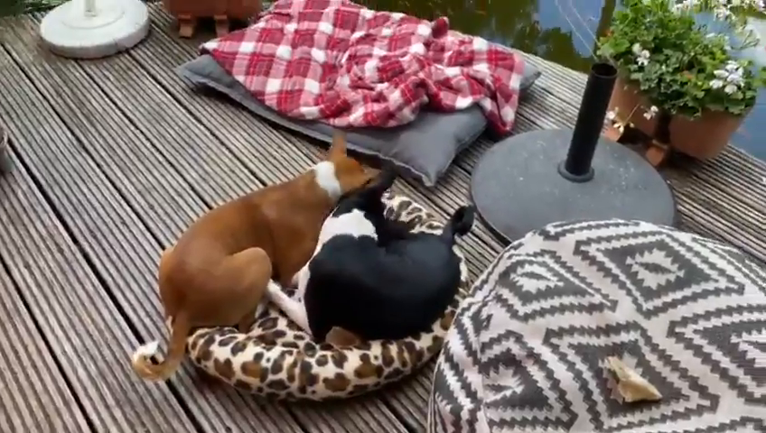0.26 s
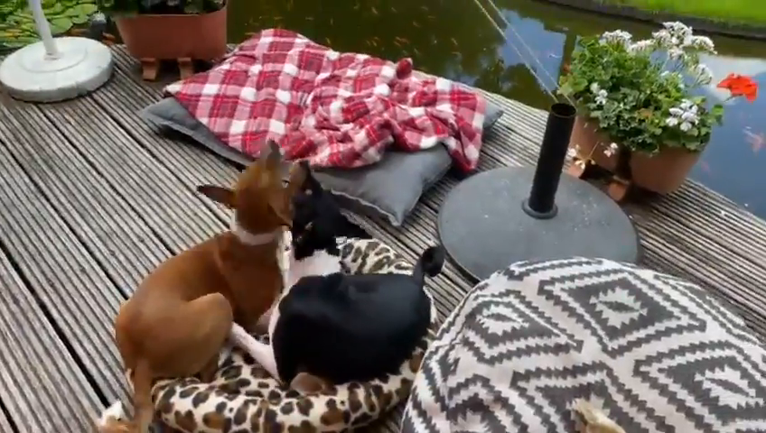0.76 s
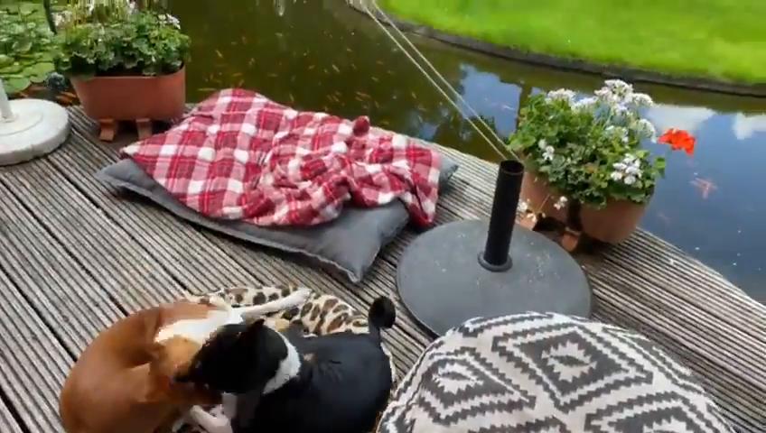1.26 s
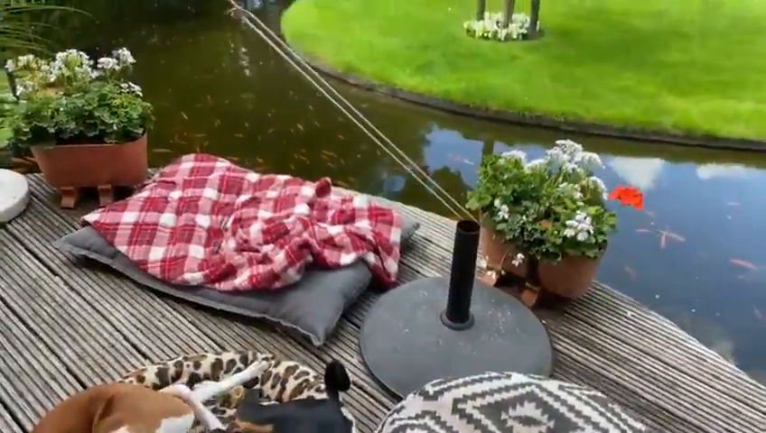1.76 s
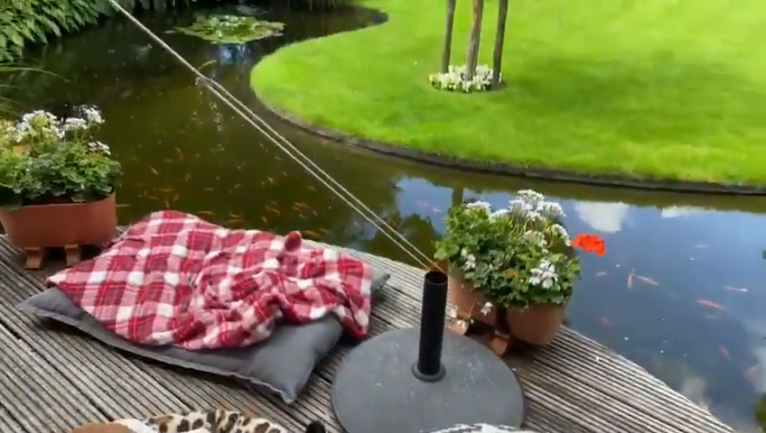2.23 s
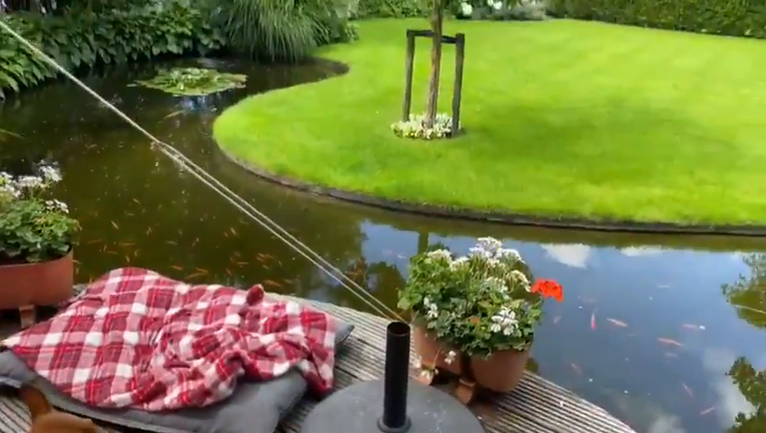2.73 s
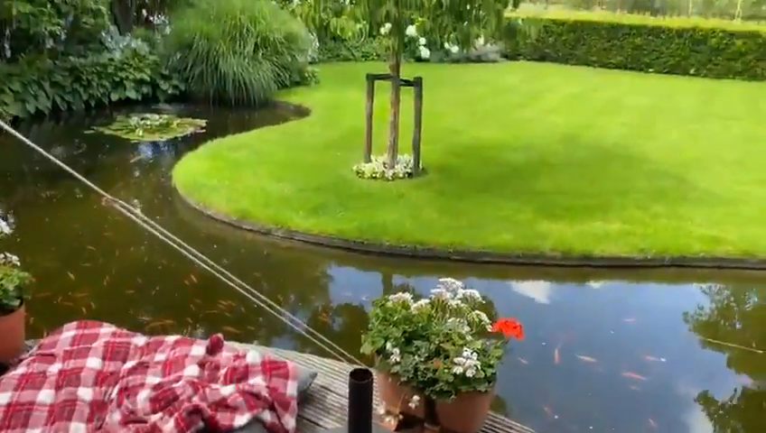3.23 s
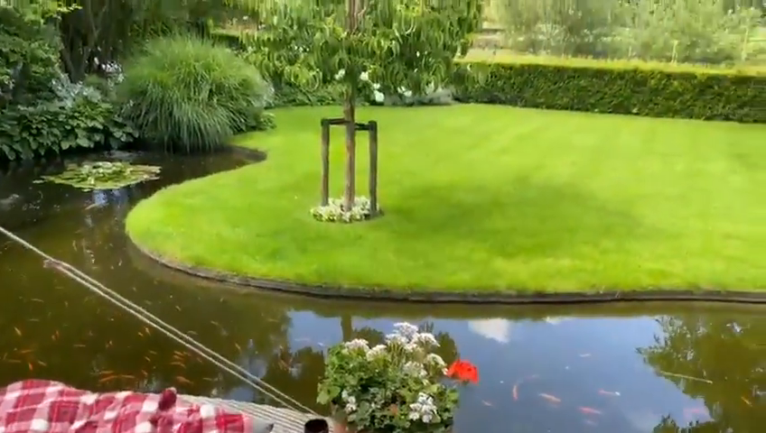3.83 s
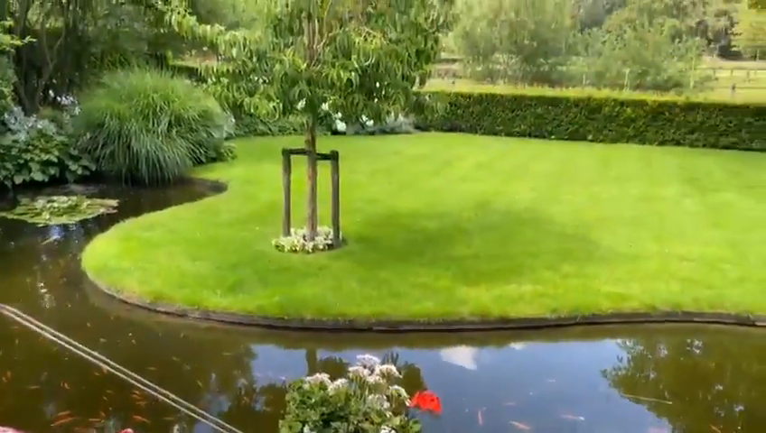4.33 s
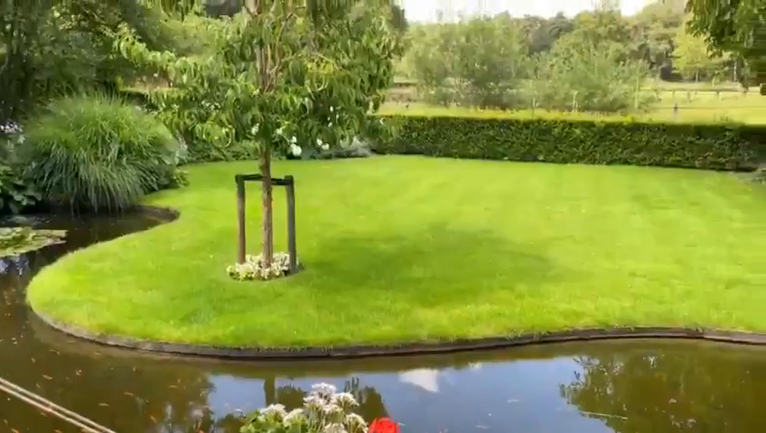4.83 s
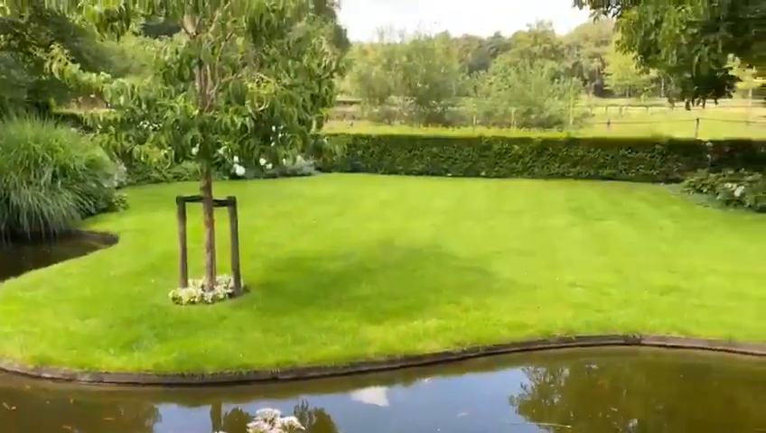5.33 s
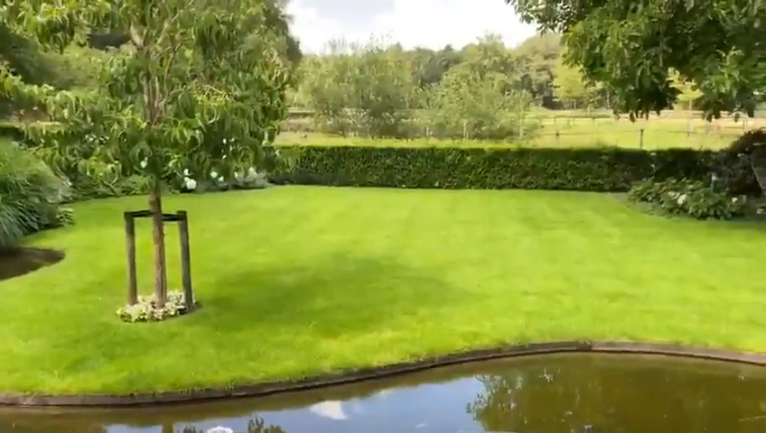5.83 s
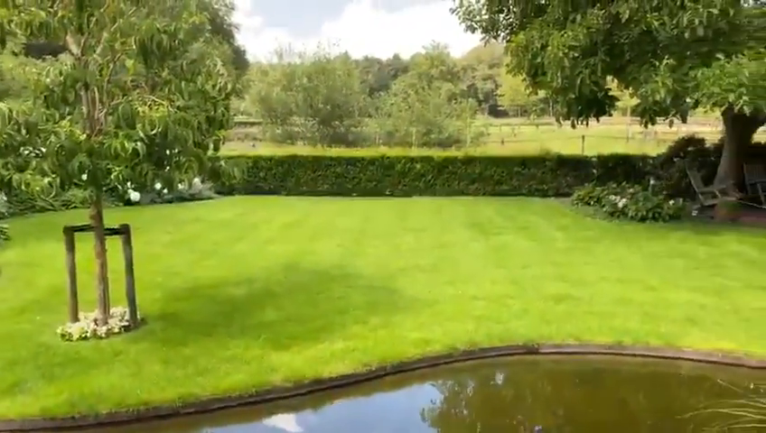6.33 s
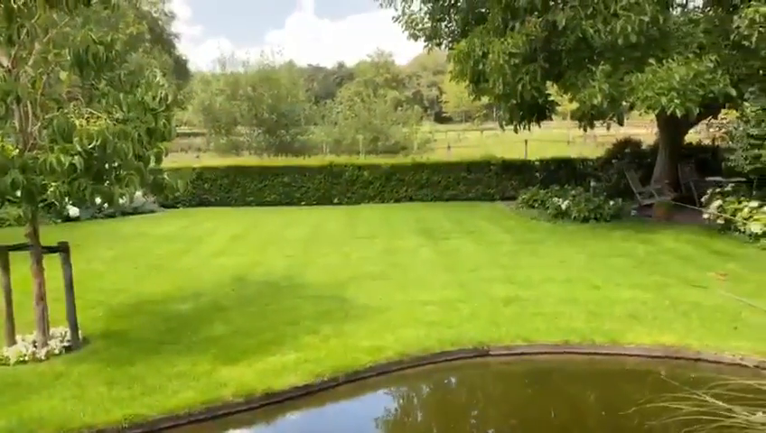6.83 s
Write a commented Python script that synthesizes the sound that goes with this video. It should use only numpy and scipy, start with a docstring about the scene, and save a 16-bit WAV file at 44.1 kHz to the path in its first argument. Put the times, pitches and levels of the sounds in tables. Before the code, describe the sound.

Quiet garden pond with soft trickling and bubbling over a faint low hum, broken once by a dog's short whimper and loud, shrill, cracking yelp.

```python
"""A garden deck by a pond. Throughout, water trickles and splashes off to the left (damped sines, shaped noise),
far machinery hums low (sines, noise) and leaves hiss (noise). Early on paws bump a cushion and fur rubs it.
A dog near the pair of microphones then whimpers and yelps once; the yelp cracks, falls and trails into a whine
(harmonics and hoarse noise). The pair turns slowly, so the water reaches the left one ever earlier."""
import sys
import numpy as np
from scipy import signal
from scipy.fft import rfft, irfft, next_fast_len
from scipy.io import wavfile
from scipy.ndimage import uniform_filter1d, map_coordinates

SR = 44100
rng = np.random.default_rng(int(sys.argv[2]) if len(sys.argv) > 2 else 0)


def master(y):
    """Save y as 16-bit WAV."""
    cut = np.clip(np.atleast_2d(y).T, -1, 1)
    pcm = np.round(cut * 32767)  # scale
    wavfile.write(sys.argv[1], SR, pcm.astype(np.int16))


def amplitude_ratio(level_db):
    """Convert a level in decibels to the matching linear amplitude (field) ratio."""
    exponent = np.asarray(level_db, float) / 20
    return 10 ** exponent


N = 312228


def unit(x):
    """x at rms 1."""
    return x / np.sqrt(np.mean(x ** 2) + 1e-20)


def along(points, hz):
    """(Hz, value) points read at hz on a log axis."""
    point_hz, value = np.transpose(points)
    return np.interp(np.log(hz + 1), np.log(point_hz + 1), value)


def curves(rows):
    """One value per sample for each column after the time."""
    s, *columns = np.transpose(rows)
    return [np.interp(np.arange(N) / SR, s, column) for column in columns]


def wobble(rate_hz):
    """A smooth random curve, rate_hz knots a second."""
    knots = rng.standard_normal(int(N * rate_hz / SR) + 4)
    return map_coordinates(knots, [np.arange(N) * rate_hz / SR])


def coloured(x, spectrum):
    """x filtered by (Hz, dB) points."""
    m = next_fast_len(N + 8192)
    gain = amplitude_ratio(along(spectrum, np.fft.rfftfreq(m, 1 / SR)))
    return irfft(rfft(x, m) * gain, m)[..., :N]


def rush(spectrum, patchy_db, channels):
    """Noise of rms 1 with patches of random gain over time and frequency."""
    z = signal.stft(rng.standard_normal((channels, N)), nperseg=512)[2]
    field = uniform_filter1d(rng.standard_normal(z.shape[1:]), size=7, axis=0)
    field = uniform_filter1d(field, size=6, axis=1)
    patchy = signal.istft(z * amplitude_ratio(patchy_db * unit(field)), nperseg=512)[1][:, :N]
    return unit(coloured(patchy, spectrum))


def plinks(s, gain, hz, cycles, rise):
    """Damped sines with a soft start; pitch drifts by the share rise per unit of life (cycles / hz)."""
    k = np.arange(1400)
    life = k / SR * (hz / cycles)[:, None]
    phase = 2 * np.pi * cycles[:, None] * life * (1 + rise * life / 2)
    envelope = np.exp(-life * 4) * (1 - np.exp(-life * 25))
    waves = gain[:, None] * np.sin(phase) * envelope
    at = (s * SR).astype(int)[:, None] + k
    return np.bincount(at.ravel(), waves.ravel(), N + 1400)[:N]


def burst(s, db, rise_s, hold_s, t60_s):
    """A gain that rises exponentially to db at s, holds and dies away."""
    t = np.arange(N) / SR - s
    decay_db = -60 * np.maximum(t - hold_s, 0) / t60_s
    return amplitude_ratio(db + decay_db) * np.exp(np.minimum(t, 0) / rise_s)


def pair(x, lead_ms):
    """One source at both microphones, the left one lead_ms earlier."""
    n, half = np.arange(N), lead_ms * SR / 2000
    return np.array([map_coordinates(x, [n + half]), map_coordinates(x, [n - half])])


def voice(rows):
    """Vocal folds: harmonics on an unsteady pitch, each spread by breath, over a hoarse hiss; the mouth filters all."""
    # Overtones sink into the throat's resonances as pitch falls.
    # Each row: pitch in Hz, 2nd harmonic in dB, 3rd harmonic in dB re the fundamental.
    overtones = [(947, 6, -8), (1030, -5, -10.5), (1052, 7, -4.5), (1225, -8.5, -14), (1284, -13, -16),
                 (1370, -16.5, -20.5), (1460, -28.5, -30.5), (1570, -10, -26.5), (1740, -20, -45.5),
                 (1950, -33, -48.5)]
    # The mouth's filter. Each row: frequency in Hz, gain in dB.
    mouth = [(4300, 0), (4900, -18), (5600, -12), (6500, -2), (8000, -2), (9500, -10)]
    clear_db, breathy_per_db = -34.5, 0.2  # weaker than clear_db turns breathy
    hz, db = curves(rows)
    pitch_hz, second, third = np.transpose(overtones)
    second_db, third_db = np.interp(hz, pitch_hz, second), np.interp(hz, pitch_hz, third)
    breath = breathy_per_db * np.maximum(clear_db - db, 0)
    phase = 2 * np.pi * np.cumsum(hz * (1 + .004 * wobble(150))) / SR
    hiss_spectrum = [(1500, -43), (3200, 4), (4400, -13.5), (5500, -16.5)]
    hiss = rush(hiss_spectrum, patchy_db=2.5, channels=1)[0]
    tone = amplitude_ratio(third_db - 4.5 + 3 * wobble(90)) * hiss
    levels = [0 * db, second_db, third_db] + [third_db - drop_db for drop_db in (18, 15, 15, 22, 22)]
    for k, level_db in enumerate(levels):
        share = np.clip(breath * (1 + 0.73 * k), 0, 1)
        flutter_db = (.3 + .6 * k) * wobble(80)
        steadiness = np.sqrt(1 - share ** 2) + share * wobble(900)
        tone = tone + amplitude_ratio(level_db + flutter_db) * steadiness * np.sin((k + 1) * phase)
    t = np.arange(N) / SR
    sounding = (t > rows[0][0]) * (t < rows[-1][0])
    return coloured(np.sqrt(2) * amplitude_ratio(db) * tone * sounding, mouth)


def around_housing(x):
    """The housing bends sound on its way to the ports: a left phase lead that depends on frequency."""
    # Each row: frequency in Hz, left lead in degrees.
    phase_lead = [(300, 30), (1100, 94), (1500, 98), (1930, 147), (2300, 237), (2700, 415), (3300, 477),
                  (3900, 500), (4500, 480)]
    m = next_fast_len(N + 8192)
    half = np.radians(along(phase_lead, np.fft.rfftfreq(m, 1 / SR))) / 2
    return irfft(rfft(x, m) * np.exp(1j * np.array([half, -half])), m)[:, :N]


def garden(x):
    """A few walls answer singly, with a diffuse tail that differs at each microphone."""
    # Decay of the tail. Each row: frequency in Hz, t60 in s.
    decay = [(500, 0.49), (2000, 0.15), (10000, 0.4)]
    # Single echoes. Each row: delay in s, level in dB, left-right difference in dB.
    walls = [(.031, -22, 2.5), (.058, -28, -1), (.1, -27.5, 2.5)]
    hz, t, z = signal.stft(rng.standard_normal((2, SR // 2)), SR, nperseg=256)
    tail = signal.istft(z * amplitude_ratio(-60 * t / along(decay, hz)[:, None]), SR, nperseg=256)[1]
    tail = amplitude_ratio(-14) * np.pad(tail, ((0, 0), (300, 0))) / np.linalg.norm(tail[0])
    for s, db, pan_db in walls:
        left = round(s * SR)
        right = left + round(pan_db * 4)  # the louder side hears it first
        tail[[0, 1], [left, right]] += amplitude_ratio([db + pan_db / 2, db - pan_db / 2])
    return signal.fftconvolve(x[None], tail, axes=1)[:, :N]


def paws():
    """Paw bumps: the cushion rings for a few cycles, its pitch falling."""
    # Each row: start in s, level in dB, cushion pitch in Hz.
    bumps = [(.879, -32, 810), (0.885, -34, 647)]
    s, db, hz = np.transpose(bumps)
    return plinks(s, 2 * amplitude_ratio(db), hz, np.full(len(s), 2.5), rise=-0.35)


def fur():
    """Fur rubbing the cushion: unsteady bursts of shaped noise."""
    # Each row: start of hold in s, level in dB, hold in s.
    rubs = [(0.878, -46, 0.019), (1.035, -54, .12)]
    # Noise shape. Each row: frequency in Hz, relative level in dB.
    cushion = [(100, -13), (260, 3.5), (450, -4), (750, 2.5), (1700, -22), (3000, -54)]
    swell = sum(burst(s, db, 0.0035, hold_s, 0.14) for s, db, hold_s in rubs)
    return swell * amplitude_ratio(3.7 * wobble(70)) * rush(cushion, patchy_db=1, channels=1)[0]


def dog():
    """Whimper and yelp reach the ports around the housing and off the garden; paws and fur arrive directly."""
    # The yelp cracks upward once and goes on as a whine.
    # Each row: time in s, pitch in Hz, fundamental level in dB rms at the mouth.
    yelp = [(2.039, 1960, -47.5), (2.046, 1933, -3), (2.0505, 1820, -12), (2.054, 1458, -0.5),
            (2.066, 1475, -7), (2.079, 1452, -3.5), (2.085, 1396, -12.5), (2.097, 1276, -17),
            (2.104, 1218, -23), (2.11, 1255, -22), (2.114, 1469, -24.5), (2.137, 1560, -30),
            (2.152, 1535, -26.5), (2.158, 1267, -21), (2.172, 1255, -23.5), (2.192, 1305, -25),
            (2.212, 1142, -22), (2.228, 1051, -28.5), (2.245, 1019, -32.5), (2.295, 950, -32.5),
            (2.331, 995, -35.5), (2.341, 1041, -26.5), (2.362, 994, -35), (2.368, 1010, -53),
            (2.385, 980, -62)]
    # The whimper before it. Each row: time in s, pitch in Hz, fundamental level in dB rms at the mouth.
    whimper = [(1.955, 942, -69), (1.975, 939, -49), (1.99, 1020, -52.5), (2.0, 1183, -39.5),
               (2.015, 1191, -62.5)]
    call = voice(yelp) + voice(whimper)
    direct = around_housing(call) * amplitude_ratio([[-.3], [.3]])
    return direct + garden(call) + pair(paws() + fur(), lead_ms=0.078) * amplitude_ratio([[.8], [-.8]])


def stream():
    """Steady flow: patchy noise with a wandering level."""
    # Each row: frequency in Hz, relative level in dB.
    trickle = [(150, -50), (300, -12), (600, 0.5), (800, -5), (1200, -4.5), (1900, -3.5), (2250, -10),
               (3300, -27.5), (7000, -21), (13000, -69.5)]
    return amplitude_ratio(4.3 * wobble(25) + 0.89 * wobble(6.5)) * rush(trickle, patchy_db=3, channels=1)[0]


def bubbles():
    """Dense small bubbles: 2200 damped sines of rising pitch, few of them loud, at rms 1."""
    draw = rng.random((2200, 4))
    hz = 1150 * np.exp(0.588 * (draw[:, 1] + draw[:, 2] - 1))
    gain = (1.01 - draw[:, 3]) ** -.33
    return unit(plinks(draw[:, 0] * N / SR, gain, hz, 10 + 20 * draw[:, 2], rise=0.091))


def fizz(bright_db):
    """A narrow flickering band of noise, louder as the pair faces the water."""
    spectrum = [(1900, -58.5), (2300, 7.5), (2600, 9.5), (3000, -13.5), (3500, -72.5)]
    return amplitude_ratio(bright_db - 17.5 + 4.1 * wobble(30)) * rush(spectrum, patchy_db=4.5, channels=1)[0]


def drops():
    """Single drops: each rings as one bubble whose pitch climbs."""
    # Each row: time in s, level in dB, pitch in Hz.
    drop_rows = [(0.376, -52, 1540), (0.666, -47, 860), (0.812, -48.5, 1410), (0.868, -44, 1540),
                 (1.37, -48.5, 1390), (1.411, -48, 650), (2.471, -43.5, 1383), (2.609, -40, 1880),
                 (2.704, -48, 1354), (2.733, -41, 1375), (3.161, -51, 950), (3.64, -42.5, 618),
                 (4.057, -50, 1400), (4.229, -37, 1790), (4.487, -45, 1440), (4.929, -39, 598),
                 (6.82, -43.5, 933)]
    s, db, hz = np.transpose(drop_rows)
    return plinks(s - .001, amplitude_ratio(db + 10.5), hz, np.full(len(s), 24.), rise=0.074)


def spray():
    """Splashes that swell and die over a flickering patter, all grainy noise."""
    # Each row: time in s, level in dB, t60 in s.
    splashes = [(1.27, -55, 0.033), (1.779, -62.5, 0.28), (2.325, -45.5, 0.18), (2.469, -52, 0.14),
                (2.93, -64, 0.53), (3.39, -58, 0.45), (4.077, -57, 0.09), (4.227, -51, 0.31),
                (4.29, -66, 0.28), (5.2, -60.5, 0.98), (5.951, -60, 0.18), (6.3, -57.5, 0.16),
                (6.748, -52.5, 0.1)]
    # Noise shape. Each row: frequency in Hz, relative level in dB.
    spectrum = [(800, -9), (2000, 2), (4200, 5.5), (7000, -5), (9500, -7.5), (13000, -24)]
    swell = sum(burst(s, db, .055 * t60_s, 0, t60_s) for s, db, t60_s in splashes)
    patter = amplitude_ratio(-68 + 2.5 * wobble(18) + 2.5 * wobble(50))
    return (swell + patter) * amplitude_ratio(3.68 * wobble(300)) * rush(spectrum, patchy_db=1.5, channels=1)[0]


def spread(x, lead_ms, facing_db):
    """Part of x arrives directly, the rest off deck and hedges by shifting paths that differ at each port."""
    # Each row: frequency in Hz, share of power arriving from all around.
    scattered = [(400, 0.97), (1000, 0.15), (1900, 0.16), (2300, 0.87), (5000, 0.35), (8000, 1), (10000, 1)]
    hop = 4096
    indirect = np.zeros((2, N + 4 * hop))
    for at in range(0, N, hop):  # new paths for each overlapping piece
        paths = rng.standard_normal((2, hop // 2)) * amplitude_ratio(-60 * np.arange(hop // 2) / SR / 0.063)
        paths = paths / np.linalg.norm(paths, axis=1, keepdims=True)
        piece = x[at:at + 2 * hop] * np.sqrt(np.hanning(2 * hop))[:N - at]
        echo = signal.fftconvolve(piece[None], paths, axes=1)
        indirect[:, at:at + echo.shape[1]] += echo
    hz, share = np.transpose(scattered)
    share = np.clip(share, .01, .99)
    direct = coloured(pair(x, lead_ms), np.c_[hz, 10 * np.log10(1 - share)])
    indirect = coloured(indirect[:, :N], np.c_[hz, 10 * np.log10(share)])
    # less indirect sound once the pair faces the source
    return direct + amplitude_ratio(-1.2 * np.maximum(facing_db + 0.5, 0)) * indirect


def water():
    """Stream, bubbles and fizz share a slowly rising flow level; drops and spray join; the left lead grows."""
    # How squarely the pair faces the water. Each row: time in s, brightness in dB.
    facing = [(0, -12), (1.15, -0.5), (2.5, -0.5), (3.2, -6), (4.5, 1.5), (7.1, 2.5)]
    t = np.arange(N) / SR
    flow = amplitude_ratio(-52 + 0.46 * t)  # nearing, dB per s
    lead_ms = 0.021 + 0.048 * t  # turning, ms per s
    bright_db = curves(facing)[0]
    body = flow * (amplitude_ratio(-4) * stream() + amplitude_ratio(-6) * bubbles()) + drops() + spray()
    return spread(body, lead_ms, bright_db) + pair(flow * fizz(bright_db), lead_ms)


def engine():
    """A far engine slowing a little: first order, and a second order that follows the load."""
    # Each row: time in s, second order level in dB.
    load = [(0, -70), (1, -60.5), (2.85, -60), (3.2, -50.5), (5.2, -53.5), (7.1, -67)]
    t = np.arange(N) / SR
    hz = 58 - .5 * t + 0.27 * wobble(3.64)
    phase = 2 * np.pi * np.cumsum(hz) / SR
    first = amplitude_ratio(-50.5 + 1.56 * wobble(6.8)) * np.sin(phase)
    return first + amplitude_ratio(curves(load)[0] + 3.5 * wobble(3.71)) * np.sin(2 * phase)


def mains():
    """A mains buzz: an unsteady 100 Hz sine and a weak steady one at 235 Hz."""
    t = np.arange(N) / SR
    buzz = amplitude_ratio(-58.5 + 2.1 * wobble(4.6)) * np.sin(2 * np.pi * 100 * t)
    return buzz + amplitude_ratio(-73) * np.sin(2 * np.pi * 235 * t)


def rumble():
    """Low noise, partly common to both microphones."""
    # Each row: frequency in Hz, relative level in dB.
    spectrum = [(15, -17.5), (30, -17), (55, -3), (80, -3), (110, -7.5), (145, -14), (300, -25.5),
                (600, -19), (1200, -80.5)]
    both, own = rng.standard_normal(N), rng.standard_normal((2, N))
    return amplitude_ratio(-56.0 + 0.98 * wobble(2.65)) * unit(coloured(both + 0.6 * own, spectrum))


def hum():
    """Engine, mains and rumble, stronger on the right."""
    return (engine() + mains() + rumble()) * amplitude_ratio([[-2.7], [2.7]])


def leaves():
    """Hedges and trees all around hiss in a light breeze: patchy noise, unalike at the two microphones."""
    # Each row: time in s, level in dB.
    breeze = [(0, -55.5), (1.15, -65), (2, -57.5), (3.3, -69), (7.1, -61.5)]
    # Noise shape. Each row: frequency in Hz, relative level in dB.
    spectrum = [(200, -5), (500, -6.5), (1000, -9.5), (2500, -24.5), (6000, -20.5), (9000, -27.5),
                (11500, -32), (14000, -72)]
    return amplitude_ratio(curves(breeze)[0] + 0.5 * wobble(4.904)) * rush(spectrum, patchy_db=6.5, channels=2)


def scene():
    """Everything that reaches the two microphones."""
    return dog() + water() + hum() + leaves()


def top_cut(x):
    """Nothing passes above the cut-off."""
    return signal.sosfilt(signal.butter(12, 11840, fs=SR, output="sos"), x)


def record(dry):
    """Each port colours its channel; gain control ducks loud sound on both alike; a low-pass limits the band."""
    # Each row: frequency in Hz, left-right difference in dB.
    ports = [(400, -0.5), (800, 3), (1900, -2), (3200, 2), (4200, 0), (6800, 4.5), (9500, -0.5)]
    hz, tilt_db = np.transpose(ports)
    left = coloured(dry[0], np.c_[hz, tilt_db / 2])
    right = coloured(dry[1], np.c_[hz, -tilt_db / 2])
    x = np.array([left, right])
    keep = np.exp(-1 / (.07 * SR))  # power smoothed over 0.07 s
    power = signal.lfilter([1 - keep], [1, -keep], np.mean(x ** 2, axis=0))
    level_db = 10 * np.log10(power + 1e-12)
    x = x * amplitude_ratio(-.3 * np.maximum(level_db + 32.5, 0))  # -0.3 dB per dB above -32.5 dB
    x = signal.sosfilt(signal.butter(12, 11300, fs=SR, output="sos"), x)
    return top_cut(x)


dry = scene()
out = record(dry)
master(out)
```